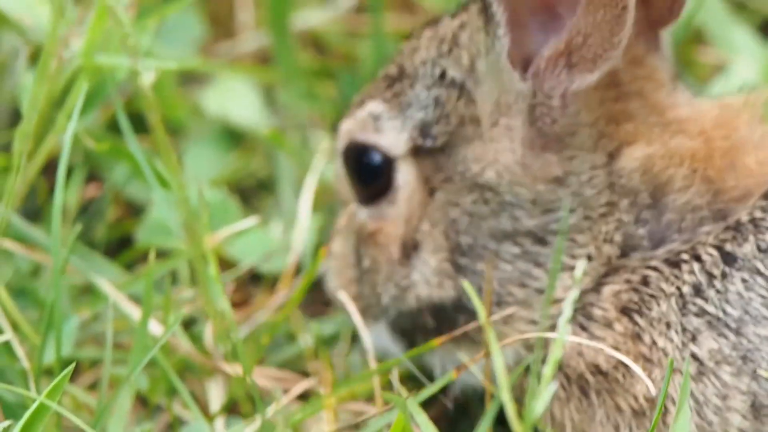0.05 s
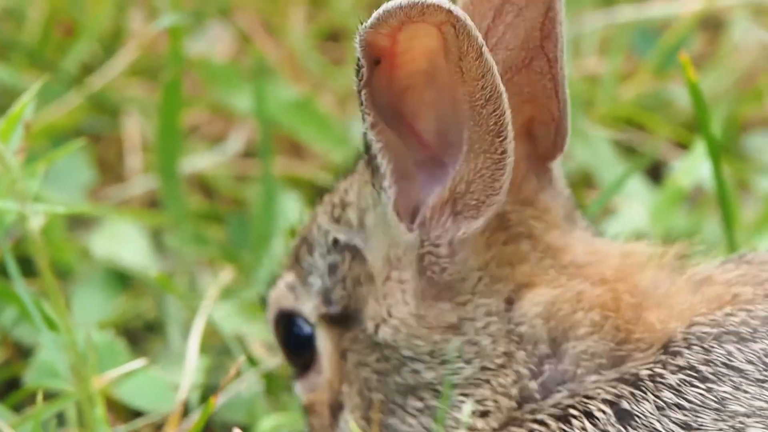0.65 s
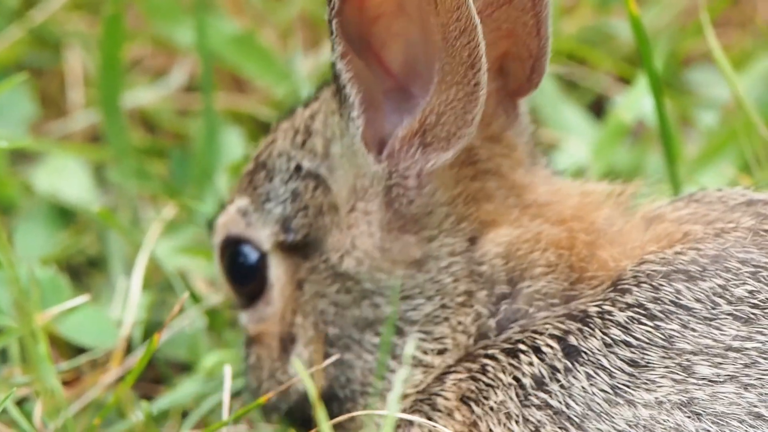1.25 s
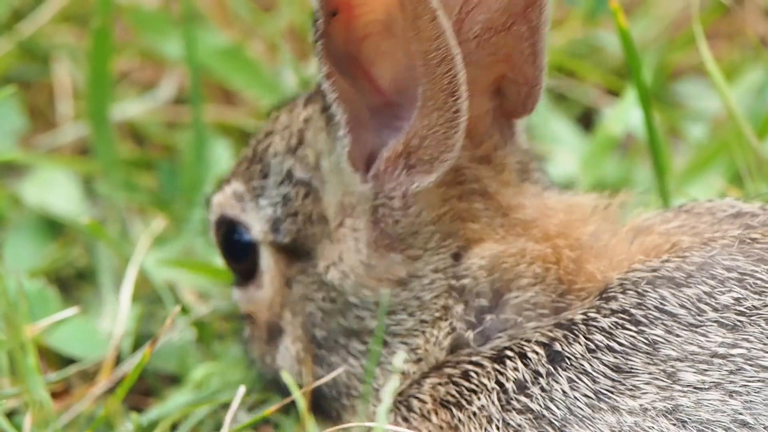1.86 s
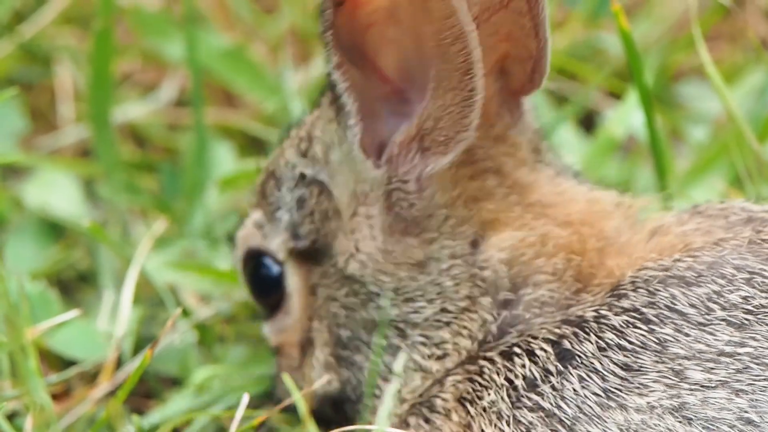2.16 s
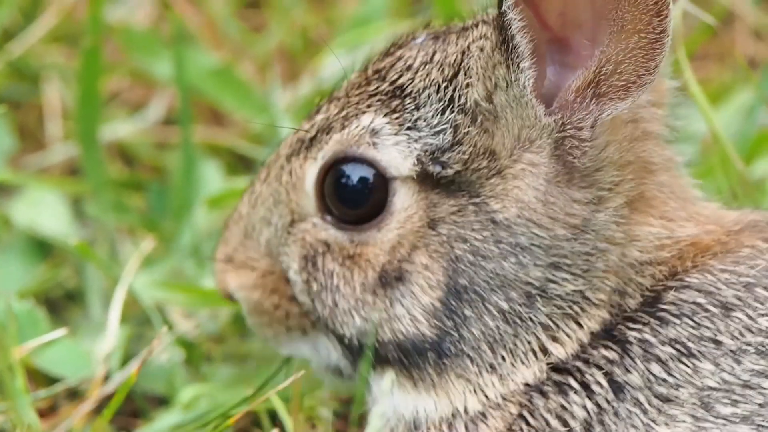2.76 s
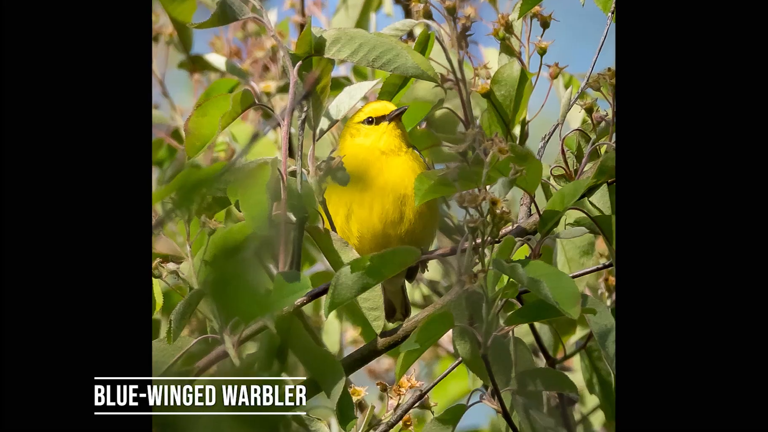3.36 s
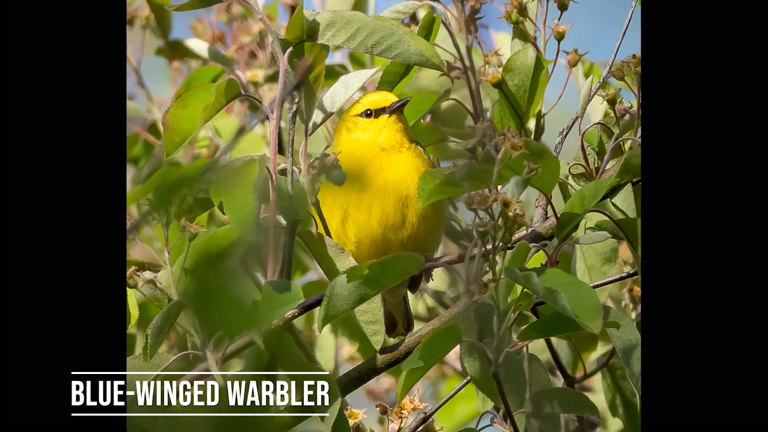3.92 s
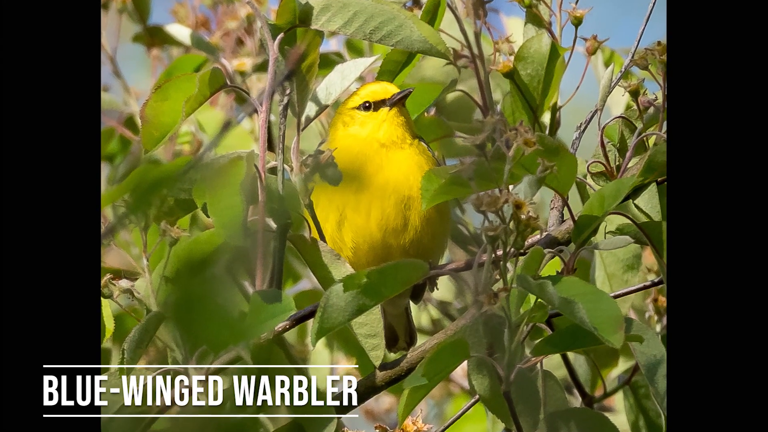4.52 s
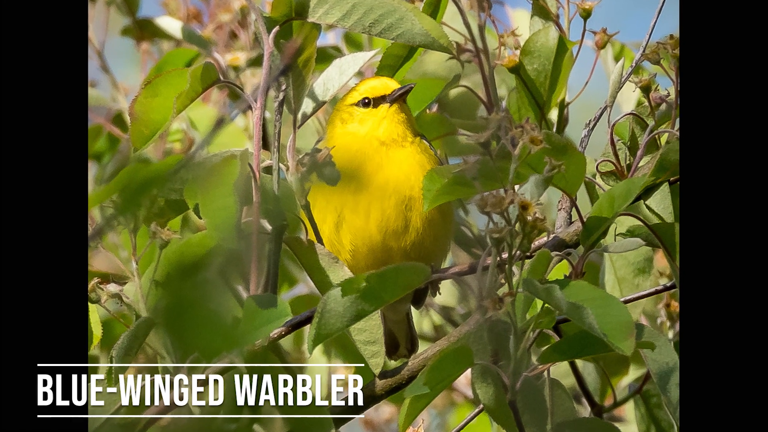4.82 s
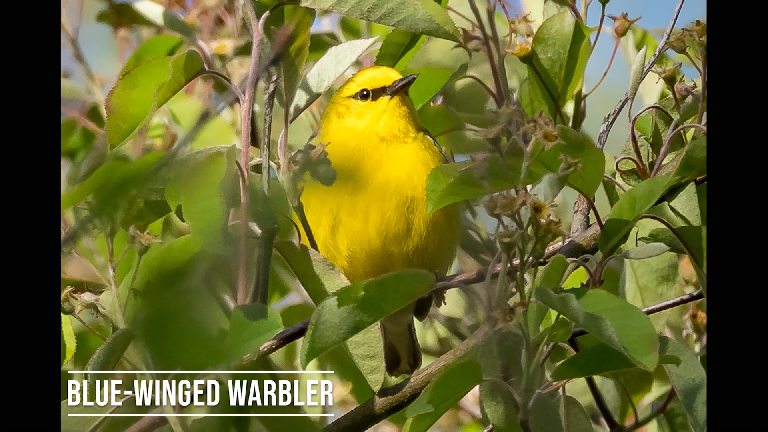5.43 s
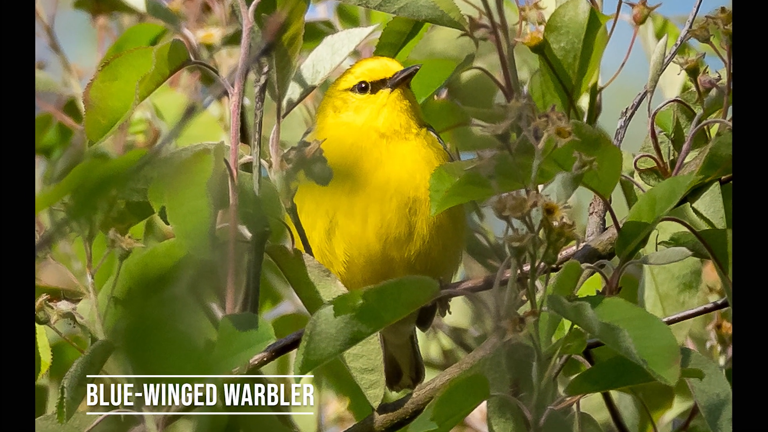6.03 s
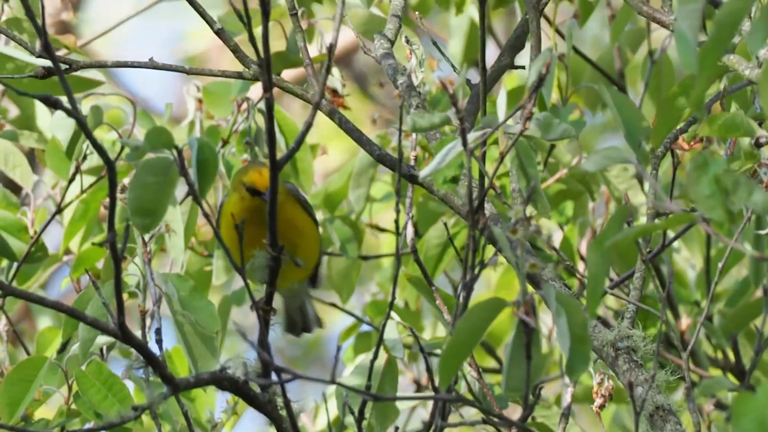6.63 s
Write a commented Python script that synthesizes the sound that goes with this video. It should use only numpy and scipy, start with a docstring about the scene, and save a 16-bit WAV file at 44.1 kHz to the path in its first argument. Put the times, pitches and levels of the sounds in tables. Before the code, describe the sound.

In a meadow with a soft hum of far traffic, small birds give thin high ticks and faint lisping calls, then two quick whistled phrases, a sharp squeak and a brief twitter. The sound switches abruptly to a wetland thicket with a low rumble. A closer songbird sings a high, insect-like buzz followed by a rapid rattle of chips. A few faint distant pips come at the end.

```python
"""Songbirds in two places. A meadow opens on far traffic hum; thin ticks start up, joined by faint calls
and lisps, then whistled phrases, a sharp squeak and a twitter, every note a gliding sine. At 3.16 s the
scene changes to a wetland thicket with a low rumble and far calls. A warbler sings its two-part buzz:
a high tone with a fast-fluttering pitch, then a slowing rattle of chips from the two sides of its syrinx.
A few faint pips and calls close the scene."""
import sys
import numpy as np
from scipy import signal
from scipy.fft import rfft, irfft, next_fast_len
from scipy.io import wavfile
from scipy.ndimage import map_coordinates

SR = 44100
rng = np.random.default_rng(int(sys.argv[2]) if len(sys.argv) > 2 else 0)


def inscribe(sig):
    """Save sig as 16-bit PCM at rate SR to the path in sys.argv[1].

    A 1-D sig is mono; a 2-D sig holds one channel per row.
    Samples are clipped to [-1, 1] before scaling.
    """
    pcm = np.round(np.clip(np.atleast_2d(sig).T, -1, 1) * 32767)
    wavfile.write(sys.argv[1], SR, pcm.astype(np.int16))


N = 294588
T = np.arange(N) / SR


def amp(db):
    """Decibels to gain."""
    return 10 ** (np.asarray(db) / 20)

def along(points, hz):
    """Read a curve of (freq_hz, value) points on a log frequency axis."""
    freqs, values = np.transpose(points)
    return np.interp(np.log(hz + 1), np.log(freqs + 1), values)

def curves(rows):
    """One automation curve for each column after the time."""
    times, *columns = np.transpose(rows)
    return [np.interp(T, times, column) for column in columns]

def wobble(rate):
    """A smooth random curve, rate knots a second."""
    return map_coordinates(rng.standard_normal(8192), [T * rate], mode="wrap")

def filtered(x, response):
    """Shape x by a frequency response."""
    size = next_fast_len(N + SR // 2)
    return irfft(rfft(x, size) * response(np.fft.rfftfreq(size, 1 / SR)), size)[..., :N]

def turns(hz):
    """Running phase of a moving pitch, in radians."""
    return 2 * np.pi * np.cumsum(hz) / SR

def add(track, start_s, sound):
    """Mix a sound into the track."""
    part = track[max(round(start_s * SR), 0):][:len(sound)]
    part += sound[:len(part)]

def noise(spectrum):
    """Coloured noise of rms 1."""
    x = filtered(rng.standard_normal(N), lambda hz: amp(along(spectrum, hz)))
    return x / np.sqrt(np.mean(x ** 2) + 1e-20)

def engine_hum(tones, waver_db, drift_hz, rate):
    """Far engines: sines that waver in level and pitch."""
    return sum(amp(db + waver_db * wobble(rate)) * np.sqrt(2) * np.sin(turns(hz + drift_hz * wobble(rate)))
               for hz, db in tones)

# Colour of the meadow bed: freq_hz, relative_db
MEADOW_BED = [(20, -28), (35, -16), (55, -2.5), (80, 0.5), (130, -5.5), (220, -16.5), (400, -15.5),
              (950, -18), (1300, -28.5), (2500, -27.5), (4500, -32.5), (7000, -40), (15500, -39.5)]
# Stereo likeness of the bed: freq_hz, correlation
MEADOW_CORRELATION = [(60, 1), (130, 0.94), (290, 0.68), (640, 0.58), (1400, 0.42), (3100, -0.23),
                      (15000, 0.02)]
# Far engine tones: pitch_hz, level_db
MEADOW_ENGINES = [(78, -54), (118, -60.5), (177, -70.5), (292, -68)]

def meadow_air():
    """Far traffic and soft hiss, centred in the bass and wide in the treble."""
    def width(hz):
        angle = np.arccos(np.clip(along(MEADOW_CORRELATION, hz), -1, 1)) / 2
        return np.array([np.cos(angle), np.sin(angle)])
    mid, side = filtered(np.array([noise(MEADOW_BED), noise(MEADOW_BED)]), width)
    bed = amp(-47.5 + .21 * wobble(3.7)) * np.array([mid + side, mid - side])
    engines = engine_hum(MEADOW_ENGINES, waver_db=1.5, drift_hz=.81, rate=5.07)
    return (bed + engines) * amp([[-.4], [.4]])

def whistles(notes, octave_db, edge, waver):
    """Gliding sines with a weak octave; edge is the share of a note that each fade takes."""
    song, unsteady = np.zeros(N), 1 + waver * wobble(250)
    for start_s, length_s, first, middle, last, db in notes:
        progress = np.linspace(0, 1, int(length_s * SR))
        pitch = np.polyval(np.polyfit([0, .5, 1], [first, middle, last], 2), progress)
        phase = turns(pitch * unsteady[int(start_s * SR) - len(pitch):][:len(pitch)])
        swell = np.sin(np.pi / 2 * np.clip(np.minimum(progress, 1 - progress) / edge, 0, 1))
        tone = np.sin(phase) + amp(octave_db) * np.sin(2 * phase)
        add(song, start_s, amp(db) * swell * np.sqrt(2) * tone)
    return song

def repeated(call, cues):
    """The notes of one call, sung again at each cue."""
    return [(s + offset_s, *shape, db + accent_db) for s, db in cues for offset_s, *shape, accent_db in call]

def foliage(x, t60_s, gap_s, channels=2):
    """Diffuse scatter from leaves and trunks."""
    t = T[:SR]
    tail = rng.standard_normal((channels, SR)) * amp(-60 * t / t60_s) * (1 - np.exp(-(t / gap_s) ** 2))
    return signal.fftconvolve(x[None], tail / np.linalg.norm(tail[0]), axes=1)[:, :N]

def perch(song, lead_ms, pan_db, direct_db, wet_db, t60_s):
    """Place a bird among leaves; positive lead and pan make it earlier and louder on the left."""
    sides = np.array([[.5], [-.5]])
    direct = filtered(song, lambda hz: np.exp(2j * np.pi * hz * sides * lead_ms / 1000))
    return amp(direct_db + pan_db * sides) * direct + amp(wet_db) * foliage(song, t60_s, gap_s=.0039)

# One tick: offset_s, length_s, first_hz, middle_hz, last_hz, accent_db
TICK_CALL = [(0, .027, 8650, 7350, 5950, 0)]
# Tick cues: start_s, level_db
TICK_CUES = [(.320, -50.5), (.638, -45.5), (.870, -47), (1.087, -45), (1.621, -48.5), (2.080, -46.5),
             (2.294, -44), (2.511, -47), (2.798, -48.5)]

def ticking_bird():
    """Thin ticks, each one steep downward slur."""
    song = whistles(repeated(TICK_CALL, TICK_CUES), octave_db=-43, edge=.3, waver=.014)
    return perch(song, lead_ms=.0076, pan_db=-3, direct_db=-16.5, wet_db=-16.5, t60_s=.3)

# Far meadow calls: start_s, length_s, first_hz, middle_hz, last_hz, level_db
DISTANT_NOTES = [(.51, .07, 5700, 5200, 4820, -65), (2.645, 0.089, 3730, 3706, 3560, -56),
                 (2.68, .19, 3300, 3010, 2950, -53.5), (2.975, 0.045, 6150, 6410, 7000, -57.5)]

def distant_bird():
    """Faint, wavering slurs from across the meadow."""
    song = whistles(DISTANT_NOTES, octave_db=-37, edge=.27, waver=.025)
    return perch(song, lead_ms=-.094, pan_db=-3.5, direct_db=1.5, wet_db=-3, t60_s=.54)

# One lisp: offset_s, length_s, first_hz, middle_hz, last_hz, accent_db
LISP_CALL = [(0, .034, 4480, 4686, 5340, 0.078), (.04, .026, 6170, 6050, 5550, 0),
             (.062, .018, 5450, 4880, 4350, 1)]
# Lisp cues: start_s, level_db
LISP_CUES = [(.673, -59.5), (.873, -58), (1.079, -59)]

def lisping_bird():
    """A soft three-note call: up, a high note, down."""
    song = whistles(repeated(LISP_CALL, LISP_CUES), octave_db=-37, edge=.11, waver=.015)
    return perch(song, lead_ms=-.085, pan_db=-4, direct_db=-2, wet_db=-3, t60_s=.46)

# Whistled phrases: start_s, length_s, first_hz, middle_hz, last_hz, level_db
WHISTLE_NOTES = [(1.436, 0.039, 1620, 1630, 1450, -52.5), (1.452, 0.031, 3290, 3120, 3030, -47.5),
                 (1.471, 0.018, 3060, 2530, 1900, -39.5), (1.508, .027, 1600, 1760, 1900, -51),
                 (1.519, 0.0089, 2500, 2305, 2050, -36.5), (1.530, 0.047, 1862, 2036, 2330, -39),
                 (2.190, 0.035, 3560, 3500, 2960, -40.5), (2.222, 0.075, 2410, 1990, 2034, -42),
                 (2.223, .072, 4630, 4066, 3980, -43.5), (2.300, 0.0094, 1970, 2540, 3100, -41),
                 (2.360, 0.031, 1853, 2340, 2220, -38.5), (2.372, 0.042, 2312, 2373, 2416, -31.5)]

def whistling_bird():
    """Two quick phrases of lower glides, a little to the left."""
    song = whistles(WHISTLE_NOTES, octave_db=-26.5, edge=.23, waver=.0038)
    return perch(song, lead_ms=.12, pan_db=2, direct_db=-4.5, wet_db=-8, t60_s=.39)

# The squeak: start_s, length_s, first_hz, middle_hz, last_hz, level_db
SQUEAK_NOTES = [(1.643, 0.064, 4445, 4630, 5170, -29.5), (1.702, 0.008, 7430, 6300, 6300, -43),
                (1.711, 0.008, 7560, 7120, 6650, -33), (1.724, 0.0086, 8500, 7190, 6870, -27.5),
                (1.730, 0.023, 7500, 7470, 6440, -29), (1.748, 0.026, 7380, 6700, 5620, -32),
                (2.280, 0.019, 7500, 6740, 5470, -41)]

def squeaking_bird():
    """A rising note that breaks into sharp, high, falling slurs."""
    song = whistles(SQUEAK_NOTES, octave_db=-18.5, edge=.65, waver=.0055)
    return perch(song, lead_ms=-.026, pan_db=3, direct_db=-8, wet_db=-8.5, t60_s=.46)

# One twitter note: offset_s, length_s, first_hz, middle_hz, last_hz, accent_db
TWITTER_CALL = [(0, 0.045, 4100, 5480, 3800, 0)]
# Twitter cues: start_s, level_db
TWITTER_CUES = [(3.048, -44.5), (3.101, -45.5), (3.125, -52)]

def twittering_bird():
    """Three quick arches of pitch on the right."""
    song = whistles(repeated(TWITTER_CALL, TWITTER_CUES), octave_db=-35, edge=.2, waver=.022)
    return perch(song, lead_ms=-.085, pan_db=-5, direct_db=-4, wet_db=-11.5, t60_s=.45)

# Colour of the thicket's rumble: freq_hz, relative_db
THICKET_RUMBLE = [(15, -10.5), (30, -8), (45, -0.5), (60, -1), (85, -6), (120, -14), (200, -28), (330, -32),
                  (520, -41.5), (1100, -47), (1450, -45.5), (2300, -54), (4800, -58.5), (12000, -66),
                  (15500, -68)]
# Colour of its hiss: freq_hz, relative_db
RINGING_HISS = [(2500, -31), (3050, 3.5), (3400, -3.5), (3700, 4), (4200, -23.5), (4700, 7), (5400, -18),
                (6500, -7.5), (7300, -3.5), (7800, 9.5), (8600, -7), (11000, -35.5)]
# Far engine tones: pitch_hz, level_db
THICKET_ENGINES = [(59, -48.5), (180, -67), (277, -68.5)]

def thicket_air():
    """A mono bed: lumpy far rumble and engines under a faint, ringing hiss."""
    rumble = amp(-43 + 1.23 * wobble(7.6)) * noise(THICKET_RUMBLE)
    engines = engine_hum(THICKET_ENGINES, waver_db=4, drift_hz=6, rate=16)
    return rumble + amp(-81.5) * noise(RINGING_HISS) + engines

# Far thicket calls: start_s, length_s, first_hz, middle_hz, last_hz, level_db
NEIGHBOUR_NOTES = [(3.160, 0.019, 6850, 6760, 6500, -63), (3.165, .046, 6300, 6320, 6400, -72),
                   (3.248, .022, 6400, 6380, 6650, -70.5), (6.592, 0.037, 3300, 3220, 3190, -69.5),
                   (6.618, 0.049, 3650, 3640, 3640, -66)]
# One slightly falling pip: offset_s, length_s, first_hz, middle_hz, last_hz, accent_db
PIP_CALL = [(0, .03, 4930, 4680, 4600, 0)]
# Pip cues: start_s, level_db
PIP_CUES = [(6.425, -75), (6.528, -66.5), (6.630, -63)]

def neighbours():
    """Far birds call through the leaves before and after the warbler."""
    calls = whistles(NEIGHBOUR_NOTES, octave_db=-40, edge=.42, waver=.0073)
    calls += whistles(repeated(PIP_CALL, PIP_CUES), octave_db=-40, edge=.45, waver=.0268)
    return calls + amp(-1.5) * foliage(calls, t60_s=.24, gap_s=.0059, channels=1)

# The warbler's opening note: time_s, centre_hz, level_db
FLUTTER_CONTOUR = [(3.885, 6970, -31), (3.94, 6910, -33), (4.02, 6914, -34.5), (4.12, 6960, -35),
                   (4.21, 7150, -33), (4.31, 7040, -36), (4.43, 7150, -34.5)]

def warbler_flutter(start_s=3.86, first_rate_hz=243, last_rate_hz=220, settle_s=.27):
    """A high tone whose pitch swings over two hundred times a second; returns it and its octave."""
    centre_hz, level_db = curves(FLUTTER_CONTOUR)
    rate_hz = last_rate_hz + (first_rate_hz - last_rate_hz) * np.exp(-np.maximum(T - start_s, 0) / settle_s)
    cycle = turns(rate_hz * (1 + .003 * wobble(60)))
    swing_hz = 600 * np.cos(cycle) + 170 * np.sin(2 * cycle) - 90 * np.cos(2 * cycle)  # lingers at the top
    sway_hz = 60 * np.sin(cycle / 3 + .25 * wobble(30))  # a three-swing pattern roughens the buzz
    phase = turns(centre_hz + swing_hz + sway_hz + 25 * wobble(500))
    gate_db = np.interp(T, [3.857, 3.864, 3.888, 4.425, 4.455, 4.475], [-83, -15.5, -1, -2, -29, -92])
    throb = 1 + .067 * np.cos(2 * cycle) + .22 * np.cos(cycle)  # loudest near the top of the swing
    swell = amp(level_db + gate_db - .3 + .67 * wobble(45)) * throb * np.sqrt(2)
    octave = swell ** 2 * amp(-13) * np.sin(2 * phase)  # grows with effort
    return swell * np.sin(phase), octave

# Pace of the rattle: time_s, chips_per_s
RATTLE_PACE = [(4.49, 49.66), (4.711, 45.06), (5.112, 43.26), (5.342, 40.05)]
# Effort of the rattle: time_s, level_db
RATTLE_EFFORT = [(4.485, -34), (4.52, -29.5), (4.55, -33), (4.66, -37), (4.94, -31.5), (4.975, -25.5),
                 (5.1, -30), (5.15, -25), (5.21, -30), (5.295, -30), (5.343, -38.5), (5.367, -57.5)]

def chip_cues(start_s=4.4848, end_s=5.375, easy_db=-32, easy_hz=7496, hz_per_db=44.5):
    """Slowing chips, louder and higher with effort: time_s, high_db, pitch_hz, low_db."""
    rate, = curves(RATTLE_PACE)
    beats = np.cumsum(rate * (T >= start_s) * (T < end_s)) / SR
    times = T[np.flatnonzero(np.diff(np.ceil(beats)))]
    push_scatter, pitch_scatter, low_scatter = rng.standard_normal((len(times), 3)).T
    push_db = np.interp(times, *np.transpose(RATTLE_EFFORT)) - easy_db + 1.17 * push_scatter
    sag_hz = 750 * np.exp((times - end_s) / .07)  # the last chips droop
    pitch_hz = easy_hz + hz_per_db * push_db - sag_hz + 109 * pitch_scatter
    low_db = -47.5 + .26 * push_db + 2 * low_scatter  # the low voice follows effort only a little
    return np.transpose([times, easy_db + push_db, pitch_hz, low_db])

def low_flick(offset_s, centre_hz, slope_hz, width_s=.000635):
    """A tiny gliding pulse from the low side of the syrinx; it moves slope_hz per width."""
    widths = offset_s / width_s
    return np.sin(turns(np.clip(centre_hz + slope_hz * widths, 3000, 6500))) / np.cosh(widths)

def warbler_rattle(peak_s=.0023, rise_s=.0022, fall_s=.0029, drop_hz=1400):
    """In each chip the low side of the syrinx flicks up, the high side arches, the low side flicks down."""
    song, t = np.zeros(N), T[:SR // 50] - .01
    from_peak = t - peak_s
    away = from_peak / np.where(from_peak < 0, rise_s, fall_s)
    crest = np.exp(-(from_peak / .0011) ** 2)  # the push of air peaks at the top of the arch
    skirt = amp(-6) * np.exp(-np.abs(away / 1.48) ** 3)
    for time_s, high_db, pitch_hz, low_db in chip_cues():
        bend, detune, timing, closing = rng.standard_normal(4)
        steepness = 1 + .24 * np.clip(bend, -2, 2)
        arch_hz = pitch_hz + 280 - drop_hz * np.log2(1 + (1.3 * away) ** 2) * steepness
        high = amp(high_db + 1) * np.sin(turns(np.maximum(arch_hz, 4000))) * (crest + skirt)
        onset = low_flick(t + .0018 + .0003 * timing, 4800 + 200 * detune, slope_hz=550)
        release = amp(-7 + 4 * np.clip(closing, -2, 1)) * low_flick(t - .0055, 4800, slope_hz=-400)
        add(song, time_s + t[0], high + amp(low_db + 8) * (onset + release))
    return song

# Colour of the warbler's voice: freq_hz, gain_db
BEAK_EQ = [(3000, -23), (3850, -12), (4250, -30.5), (4550, -3.5), (5150, -4.5), (5550, -22.5), (6200, 4),
           (7900, 1.5), (8400, -15), (9000, -26)]

def warbler(echo_s=.0122, echo_db=-12):
    """Flutter and rattle, coloured by the beak, with one ground echo and leaf scatter."""
    flutter, octave = warbler_flutter()
    song = filtered(flutter + warbler_rattle(), lambda hz: amp(along(BEAK_EQ, hz))) + octave
    echo = amp(echo_db) * np.interp(T - echo_s, T, song)
    bush = amp(-5) * foliage(song, t60_s=.115, gap_s=.001, channels=1)
    trees = amp(-21) * foliage(song, t60_s=.3, gap_s=.01, channels=1)
    return amp(-3) * (song + echo + bush + trees)

def scene(change_s=3.16, crossfade_s=.004):
    """The meadow gives way at once to the thicket."""
    meadow = (meadow_air() + ticking_bird() + distant_bird() + lisping_bird()
              + whistling_bird() + squeaking_bird() + twittering_bird())
    thicket = thicket_air() + neighbours() + warbler()
    blend = np.clip((T - change_s) / crossfade_s + .5, 0, 1)
    return (1 - blend) * meadow + blend * thicket

def record(dry, fade_s=.004, top_hz=15750):
    """Quick fades at both ends, then a brick-wall low-pass."""
    fades = np.clip(np.minimum(T, T[-1] - T) / fade_s, 0, 1)
    return filtered(dry * fades, lambda hz: hz < top_hz)


dry = scene()
out = record(dry)
inscribe(out)
```